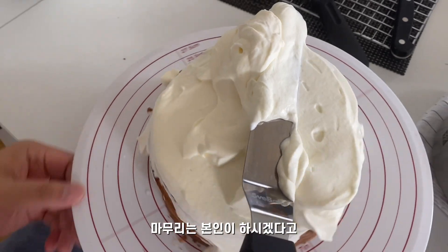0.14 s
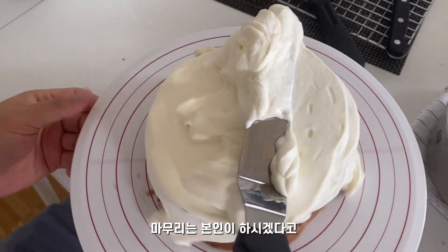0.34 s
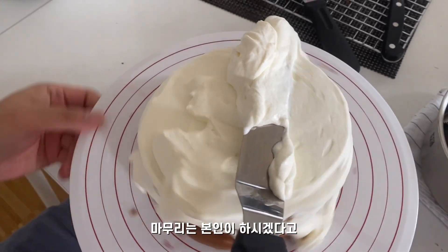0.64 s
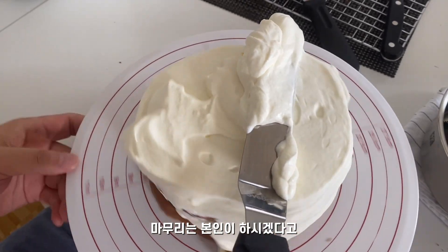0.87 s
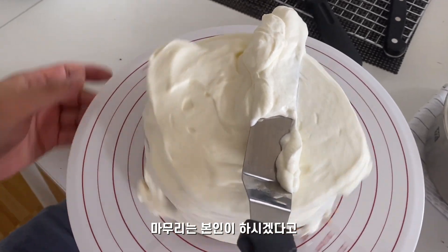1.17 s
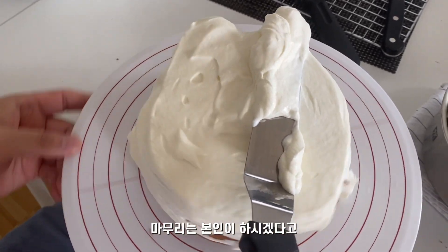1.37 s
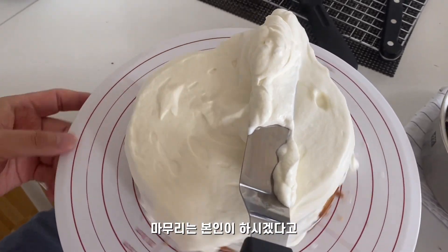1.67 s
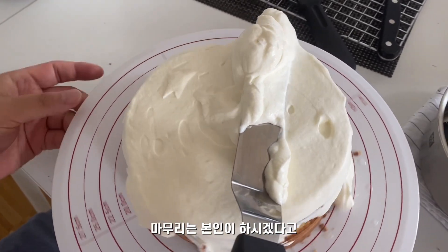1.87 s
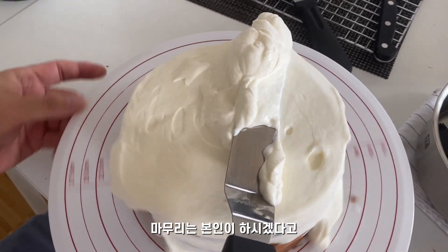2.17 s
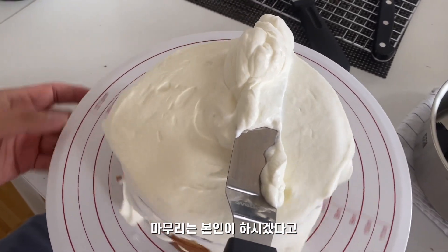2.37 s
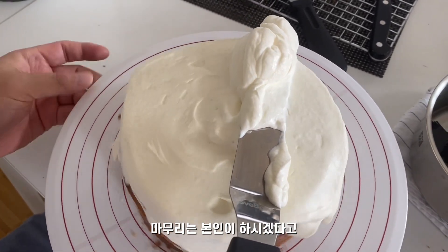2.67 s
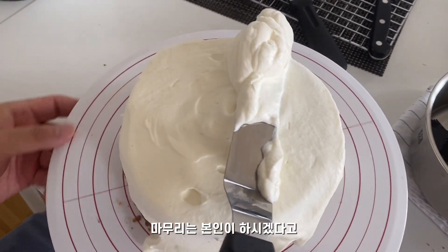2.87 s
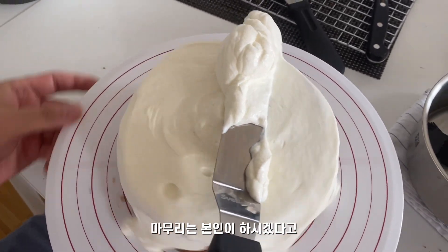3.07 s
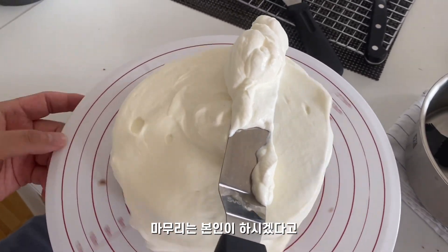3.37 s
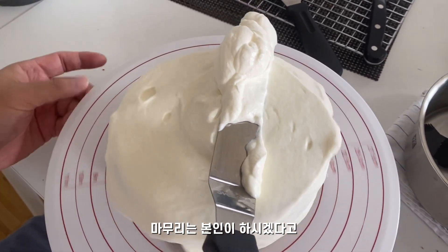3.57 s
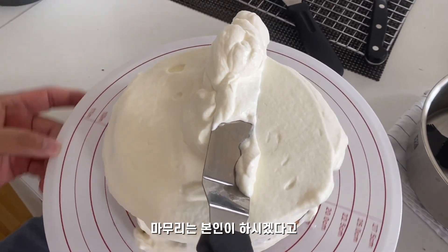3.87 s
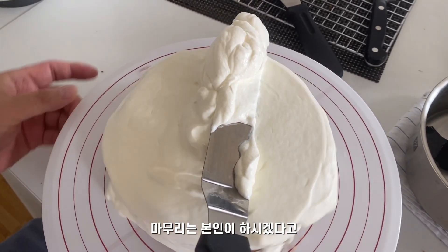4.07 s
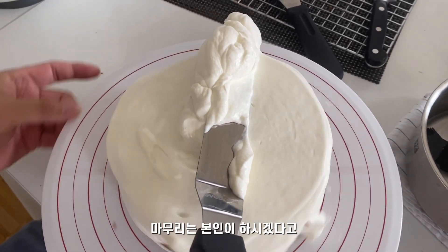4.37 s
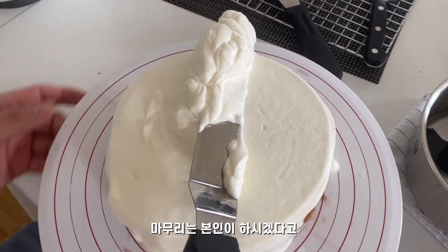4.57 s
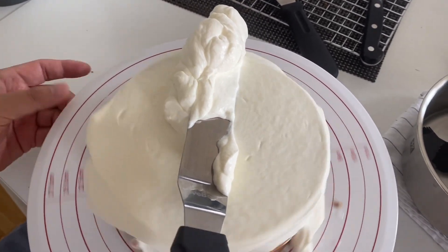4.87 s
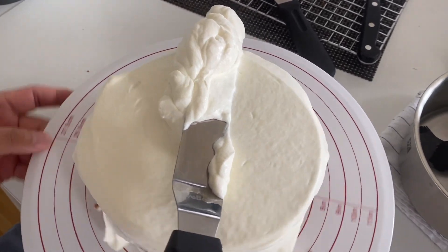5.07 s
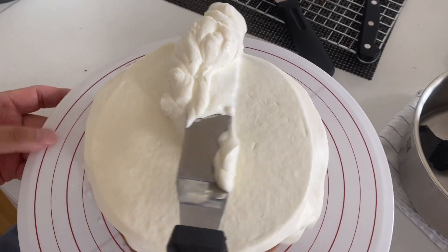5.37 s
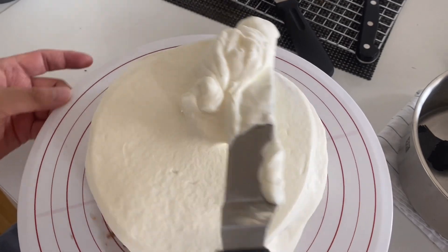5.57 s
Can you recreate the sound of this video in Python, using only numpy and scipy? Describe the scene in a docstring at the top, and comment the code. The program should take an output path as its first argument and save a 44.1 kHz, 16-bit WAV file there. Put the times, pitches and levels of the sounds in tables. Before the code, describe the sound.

A plastic cake turntable spins close to the microphone in a quiet kitchen, its bearing giving a soft, low, uneven rumble throughout. At the start a metal spatula swishes quietly through whipped cream, returning faintly around 1 and 1.5 seconds and barely audible afterwards. Fingers slide along the rim with brief hisses and rubs, and tap it irregularly, several times a second, each tap a light click with a dull ring. At 0.8 seconds the platter rocks onto its base with a hard plastic knock, the loudest sound. Four ever softer knocks follow at about 1.2, 1.9, 2.8 and 4 seconds. A fingertip gives two tiny, high squeaks near 1.5 and 3.1 seconds. The tapping carries on until about 5.5 seconds, and a short room echo follows the taps and knocks.

```python
"""A cake turns on a plastic turntable in a kitchen, close to a phone.
From the start the bearing rumbles softly and a metal spatula swishes through whipped cream.
Fingers slide along the rim and tap it to keep it spinning, and the room answers each tap.
At 0.8 s the platter rocks and knocks loudly on its base; four ever softer knocks follow up to 4 s.
Between them a fingertip gives two tiny squeaks, and the tapping goes on almost to the end."""
import sys
import numpy as np
from scipy import signal
from scipy.fft import rfft, irfft, next_fast_len
from scipy.io import wavfile
from scipy.ndimage import uniform_filter1d, map_coordinates

SR = 44100
rng = np.random.default_rng(int(sys.argv[2]) if len(sys.argv) > 2 else 0)


def file_out(sig):
    """Save sig as 16-bit WAV at sys.argv[1]."""
    # one column per channel
    cols = np.atleast_2d(sig).T
    # limit, then scale
    lim = np.clip(cols, -1, 1)
    pcm = np.round(lim * 32767).astype(np.int16)
    wavfile.write(sys.argv[1], SR, pcm)


N = 253134

# How the bearing's rumble rises and falls: time_s, level_db
RUMBLE_LEVELS = [(0.0, -63), (0.14, -59.5), (0.34, -64.5), (0.51, -70.5), (1.07, -62), (1.39, -65),
                 (1.8, -68), (1.9, -79.5), (2.41, -65), (2.56, -69), (3.23, -73), (3.55, -59.5),
                 (3.76, -69), (4.24, -67), (4.41, -74), (4.52, -69), (5.35, -65), (5.74, -69.5)]
# Folds of cream passing under the blade: peak_s, length_s, level_db
CREAM_FOLDS = [(0.02, 0.38, -63), (0.76, 0.27, -80), (0.97, 0.18, -71.5), (1.085, .07, -69),
               (1.52, 0.1, -77.5), (2.619, 0.44, -90), (4.73, 0.12, -88)]
# Fingers sliding along the rim: peak_s, length_s, hiss_db, pressure_db (more gives more rub)
FINGER_SLIDES = [(0.095, 0.027, -79, -14), (0.168, 0.045, -76, 11.5), (0.314, 0.072, -71, 5.5),
                 (0.477, .018, -75.5, 10), (0.576, 0.082, -64.5, -11.5), (0.706, .04, -67, 0.5),
                 (1.06, 0.064, -82, 1), (1.445, .12, -82, 2), (2.003, .035, -76.5, -2),
                 (2.09, 0.052, -64.5, 4), (2.64, 0.084, -84, -12.5), (2.843, 0.034, -75, -20),
                 (3.052, 0.049, -69, -11.5), (3.187, 0.28, -86.5, 7.5), (3.454, 0.093, -64.5, 4.5),
                 (3.523, 0.052, -79, 8), (3.577, 0.038, -64, -1), (3.904, .04, -68.5, -1.5),
                 (4.032, 0.039, -79.5, 2), (4.301, .04, -76, 8.5), (4.409, 0.06, -77, -0.5),
                 (4.67, 0.065, -82.5, -0.5), (4.753, 0.052, -70.5, -5), (4.834, 0.084, -81, -8.5),
                 (5.095, 0.053, -74.5, 4.5), (5.195, 0.052, -80, -12.5)]
# Fingers landing on the rim: start_s, click_db, weight_db (more gives more ring and thump)
FINGER_TAPS = [(0.177, -49, 14), (0.5036, -50, 7), (0.5236, -55.5, 8.5), (0.6561, -65, 3),
               (0.8799, -43, 7.5), (1.28, -40.5, 7.5), (1.481, -64, 14.5), (1.6801, -43, 15),
               (1.744, -42, -0.5), (2.024, -46, 16.5), (2.0462, -49.5, 10), (2.1476, -44.5, 5),
               (2.4173, -48.5, 15.5), (2.439, -50.5, 12), (2.8604, -46.5, 9), (3.1103, -63.5, 10.5),
               (3.1328, -64, 4), (3.3181, -40.5, 12), (3.3658, -51, 4), (4.2138, -44.5, 11.5),
               (4.6776, -64.5, 12.5), (5.0558, -58.5, 14.5), (5.244, -54, 11.5), (5.3483, -46, 12.5),
               (5.5266, -60.5, 16)]
# The platter rocking onto its base: start_s, clatter_db, ring_db, thump_db
PLATTER_KNOCKS = [(0.814, -22.5, -16.5, -35.5), (1.1842, -32, -26.5, -44.5), (1.9383, -40, -36, -52.5),
                  (2.7789, -47.5, -40, -59), (4.0159, -63, -45.5, -63.5)]
# Skin catching on plastic: start_s, length_s, pitch_hz, pitch_rise_share, level_db
SKIN_SQUEAKS = [(1.526, 0.008, 5400, .22, -71), (3.13, 0.08, 7350, .05, -85)]
# The tones of the platter with the cake on it: pitch_hz, level_db
PLATTER_TONES = [(126, 1.5), (162, 0), (200, 2), (240, -11), (295, -17.5), (350, -8), (385, 0), (420, 4),
                 (452, -2), (485, -36), (746, -2.5), (922, -2.5), (1063, -6), (1188, 2.5), (1330, -19.5),
                 (1447, -9), (1608, -9), (2435, -13), (2890, -13.5), (3122, -13.5), (3820, -32),
                 (4800, -23), (5050, -22)]
# How long the platter takes to fade by 60 dB: pitch_hz, fade_s
PLATTER_FADES = [(125, .16), (200, .13), (300, .05), (350, .045), (385, .075), (420, .036), (452, .08),
                 (490, .06), (750, .08), (1200, .075), (5000, .06)]

# The colour of each noise, or how strong it is from low to high: pitch_hz, level_db
BEARING_COLOUR = [(25, -25.5), (50, 12), (90, -8), (130, -1), (210, -0.5), (290, -5.5), (390, -9),
                  (460, -11.5), (600, -17), (1100, -25), (3000, -36.5), (9000, -50.5)]
CREAM_COLOUR = [(300, -14.5), (800, -4), (1400, -2.5), (1800, 7.5), (2130, 5.5), (2550, -9.5), (4500, -12),
                (7000, -22), (12000, -36.5)]
HISS_COLOUR = [(1500, -21.5), (4500, -5), (7000, -9), (8500, -4.5), (10400, 0), (12200, -4), (14500, -3),
               (16000, -6)]
RUB_COLOUR = [(150, -17.5), (300, 13.5), (470, 18.5), (650, -8), (1080, 9.5), (1450, -4), (2000, 3.5),
              (4500, -8.5), (7000, -12.5), (10000, -22.5)]
CLICK_COLOUR = [(200, -11.5), (480, 6), (680, -4.5), (1080, 9.5), (1500, -4.5), (2100, -3), (4200, -3.5),
                (6500, -11), (8300, -14), (10500, -7), (15000, -14)]
CLATTER_COLOUR = [(250, -23.5), (700, -2.5), (1350, -1.5), (2000, -6.5), (2500, -12.5), (3200, -10),
                  (5100, -17), (5800, -25.5), (7300, -22), (8500, -23), (15000, -33.5)]
AIR_COLOUR = [(20, -15), (50, 2), (150, -5), (400, -21), (1000, -28.5), (3000, -33), (8000, -32),
              (15000, -42.5)]

# How long the kitchen's echo takes to fade by 60 dB: pitch_hz, fade_s
ECHO_FADES = [(100, 0.85), (300, 0.17), (800, .46), (2000, 0.32), (5000, 0.33), (10000, 0.11),
              (15000, 0.17)]
# How strong that echo is: pitch_hz, level_db
ECHO_LEVELS = [(100, -1.5), (400, -4.5), (800, -10), (2000, -10), (5000, -10.5), (10000, -12), (15000, -12)]
# Bounces off the table top and near walls: delay_s, level_db
WALL_BOUNCES = [(0.0023, -31), (0.0047, -10.5), (0.0086, -26), (0.0117, -18)]
# How alike a noise is on the left and right: pitch_hz, likeness (0 to 1)
STEREO_LIKENESS = [(100, 0.8), (350, 1), (800, 0), (2000, .35), (6000, 0.15), (9000, 1), (15000, 0.96)]
# How the phone's two microphones differ: pitch_hz, left_minus_right_db
MIC_BALANCE = [(100, -2.5), (220, 1.5), (400, 4.5), (800, 1), (1300, 0), (2400, 2), (4400, 5), (8000, 0)]

FADE_60_DB = np.log(1000)  # exp(-FADE_60_DB) is a drop of 60 dB


def amp(db):
    """Turn decibels into a number to multiply by."""
    return 10 ** (np.asarray(db) / 20)


def unit(x):
    """Scale a signal to an average (rms) strength of 1."""
    return x / np.sqrt(np.mean(x ** 2) + 1e-20)


def at_pitch(table, hz):
    """Read a table between its rows, on a log scale of pitch."""
    pitches, values = np.transpose(table)
    return np.interp(np.log(hz + 1), np.log(pitches + 1), values)


def wobble(rate):
    """A smooth curve through `rate` random points a second."""
    points = rng.standard_normal(int(N * rate / SR) + 4)
    return map_coordinates(points, [np.arange(N) * rate / SR])


def swell(peak_s, length_s, rise_share):
    """A level that grows to 1 and dies away, staying within about 9 dB of the top for length_s."""
    t = np.arange(N) / SR - peak_s
    distance = np.abs(t) / (length_s * np.where(t < 0, rise_share, 1 - rise_share))
    return np.exp(-np.minimum(distance, 20) ** 1.7)


def filtered(x, response):
    """Multiply each frequency in x by response(hz)."""
    size = x.shape[-1]
    padded = next_fast_len(size + 4096)
    hz = np.fft.rfftfreq(padded, 1 / SR)
    return irfft(rfft(x, padded) * response(hz), padded)[..., :size]


def noise(colour, size=N):
    """Coloured stereo noise of strength 1, partly alike on both sides."""
    def response(hz):
        spread = np.arccos(at_pitch(STEREO_LIKENESS, hz)) / 2
        return amp(at_pitch(colour, hz)) * [np.cos(spread), np.sin(spread)]
    mid, side = filtered(rng.standard_normal((2, size)), response)
    return unit(np.array([mid + side, mid - side]))


def patchy(x, depth_db):
    """Random patches in pitch and time make a noise flicker in colour."""
    bands = signal.stft(x, nperseg=256)[2]
    patches = uniform_filter1d(rng.standard_normal(bands.shape[1:]), size=4, axis=0)
    patches = uniform_filter1d(patches, size=7, axis=1)
    return unit(signal.istft(bands * amp(depth_db * unit(patches)), nperseg=256)[1][:, :N])


def add(track, start_s, sound):
    """Mix a sound into the track at start_s."""
    part = track[:, round(start_s * SR):][:, :sound.shape[1]]
    part += sound[:, :part.shape[1]]


def in_kitchen(x, echo_db=0, build_s=0.0045):
    """A sound plus the room's echo, in which each pitch dies at its own speed."""
    hz, t, bands = signal.stft(noise([(1, 0)], size=SR // 2), SR, nperseg=256)
    fade_s = at_pitch(ECHO_FADES, hz)[:, None]
    gain = amp(at_pitch(ECHO_LEVELS, hz) + echo_db)[:, None] * np.sqrt(2 * FADE_60_DB / (fade_s * SR))
    tail = signal.istft(bands * gain * np.exp(-FADE_60_DB * t / fade_s), SR, nperseg=256)[1]
    tail *= 1 - np.exp(-(np.arange(tail.shape[1]) / SR / build_s) ** 2)
    return x + signal.fftconvolve(x, tail, axes=1)[:, :x.shape[1]]


def near_walls(x):
    """A few quick bounces strengthen some pitches and weaken others."""
    def bounces(hz):
        return sum(amp(db) * np.exp(-2j * np.pi * hz * delay_s) for delay_s, db in WALL_BOUNCES)
    return filtered(x, lambda hz: 1 + bounces(hz))


def bearing_rumble(gain_db=1):
    """The bearing rolls unevenly and rumbles through the platter and the table."""
    times_s, levels_db = np.transpose(RUMBLE_LEVELS)
    level = amp(np.interp(np.arange(N) / SR, times_s, levels_db) + gain_db)
    lumps = unit(amp(3 * wobble(rate=16)))
    return level * lumps * noise(BEARING_COLOUR)


def cream_swish(smooth_cream_db=-95):
    """Foam smears under the blade, louder each time a fold of cream passes beneath it."""
    folds = sum(amp(db) * swell(peak_s, length_s, rise_share=0.49)
                for peak_s, length_s, db in CREAM_FOLDS)
    bubbles = unit(amp(1.8 * wobble(rate=300)))
    return (amp(smooth_cream_db) + folds) * bubbles * noise(CREAM_COLOUR)


def finger_slides(hiss_gain_db=2.5, rub_gain_db=2, drag_db=-28, drag_pressure_db=5.5, grabs_per_s=36):
    """Skin hisses along the rim; pressed harder, it also rubs the platter into sound."""
    moves = [(amp(db) * swell(peak_s, length_s, rise_share=0.76), pressure_db)
             for peak_s, length_s, db, pressure_db in FINGER_SLIDES]
    for start_s, click_db, _ in FINGER_TAPS:  # after each tap the finger drags briefly
        landed = np.arange(N) / SR > start_s
        drag = landed * swell(start_s + 0.03, length_s=0.071, rise_share=0.4)
        moves.append((amp(click_db + drag_db) * drag, drag_pressure_db))
    hiss_level = amp(hiss_gain_db) * sum(level for level, _ in moves)
    rub_level = amp(rub_gain_db) * sum(amp(pressure_db) * level for level, pressure_db in moves)
    # sliding skin catches at random and lets go in about 0.6 ms
    catches = (rng.random(N) < grabs_per_s / SR) * rng.exponential(size=N)
    grabs = signal.lfilter([1], [1, -np.exp(-1 / (0.0006 * SR))], catches)
    grip = unit(amp(1.5 * wobble(rate=1500)) + amp(1) * grabs)
    hiss = hiss_level * patchy(noise(HISS_COLOUR), depth_db=3)
    rub = rub_level * patchy(noise(RUB_COLOUR), depth_db=3)
    return in_kitchen(grip * (hiss + rub), echo_db=1)


def finger_taps(click_fade_s=0.051, snap_db=4, snap_s=0.0028):
    """A soft fingertip: a snap of skin, then the platter's dull ring; more weight gives more thump."""
    out, t = np.zeros((2, N)), np.arange(SR // 2) / SR
    for start_s, click_db, weight_db in FINGER_TAPS:
        fade = np.exp(-FADE_60_DB * t / click_fade_s) + amp(snap_db) * np.exp(-t / snap_s)
        click = amp(click_db - 5) * fade * noise(CLICK_COLOUR, size=len(t))
        ring = platter_ring(t, low_db=click_db - 18.5 + 1.593 * weight_db,
                            middle_db=click_db + weight_db - 3.5, high_db=click_db - 10,
                            travel_s=0.0011, rise_s=0.0028)
        add(out, start_s, in_kitchen(click + ring, echo_db=0.5))
    return out


def platter_ring(t, low_db, middle_db, high_db, travel_s, rise_s):
    """The struck platter bends; low tones travel slower, so they arrive last and swell most gently."""
    hz, tone_db = np.transpose(PLATTER_TONES)[:, :, None]
    strike_db = np.select([hz < 300, hz < 600], [low_db, middle_db], high_db)
    hz = hz * (1 + 0.006 * rng.standard_normal(hz.shape))  # the load shifts as the cake turns
    slowness = np.sqrt(420 / hz)  # stretches travel_s and rise_s, which hold at 420 Hz
    age_s = np.maximum(t - travel_s * slowness, 0)
    rise = 1 - np.exp(-(age_s / (rise_s * slowness)) ** 2)
    fade = np.exp(-FADE_60_DB * age_s / at_pitch(PLATTER_FADES, hz))
    level = amp(strike_db + tone_db + 1.5 * rng.standard_normal(hz.shape))
    return np.sum(level * rise * fade * np.sin(2 * np.pi * hz * age_s), axis=0)


def platter_knocks(clatter_rise_s=0.00033, clatter_fade_s=0.045):
    """Hard plastic hits plastic: the contact chatters briefly and sets the platter ringing."""
    out, t = np.zeros((2, N)), np.arange(SR * 2 // 3) / SR
    for start_s, clatter_db, ring_db, thump_db in PLATTER_KNOCKS:
        chatter = unit(amp(3 * wobble(rate=600)))[:len(t)]
        shape = (1 - np.exp(-t / clatter_rise_s)) * np.exp(-FADE_60_DB * t / clatter_fade_s)
        clatter = amp(clatter_db - 3) * chatter * shape * noise(CLATTER_COLOUR, size=len(t))
        ring = platter_ring(t, low_db=thump_db - 1, middle_db=ring_db + 3, high_db=clatter_db - 4,
                            travel_s=0.002, rise_s=0.0046)
        # the contact is hidden under the platter, so more of its clatter arrives by way of the room
        add(out, start_s, in_kitchen(clatter, echo_db=7) + in_kitchen(ring[None], echo_db=-1))
    return out


def finger_squeaks():
    """A fingertip sticks and slips fast enough to give a tiny rising tone."""
    out = np.zeros((2, N))
    for start_s, length_s, hz, pitch_rise, db in SKIN_SQUEAKS:
        progress = np.linspace(0, 1, round(length_s * SR))[None]
        phase = 2 * np.pi * np.cumsum(hz * (1 + pitch_rise * progress)) / SR
        add(out, start_s, amp(db) * np.sin(np.pi * progress) * np.sin(phase))
    return in_kitchen(out)


def scene(air_db=-76):
    """All the sounds together, over the still air of the kitchen."""
    handling = near_walls(finger_taps() + platter_knocks() + finger_slides() + finger_squeaks())
    return handling + bearing_rumble() + cream_swish() + amp(air_db) * noise(AIR_COLOUR)


def record(dry, low_cut_hz=36, top_hz=15900, lag_above_hz=6300, lag_s=0.00026):
    """The phone drops the lowest and highest sound; its sides differ in colour, and left treble lags."""
    def response(hz):
        half_lag = np.exp(-1j * np.pi * lag_s * np.maximum(hz - lag_above_hz, 0))
        left = amp(at_pitch(MIC_BALANCE, hz) / 2) * half_lag
        right = 1 / left
        low_cut = (1j * hz / (low_cut_hz + 1j * hz)) ** 2
        return np.array([left, right]) * low_cut * (hz < top_hz)
    return filtered(dry, response)


dry = scene()
out = record(dry)
file_out(out)
```